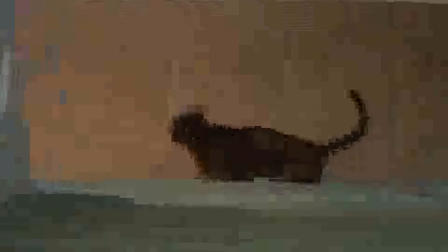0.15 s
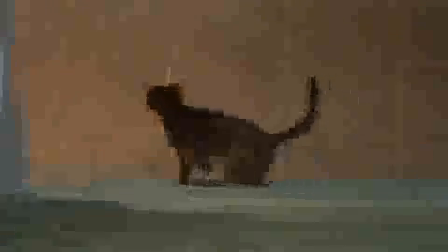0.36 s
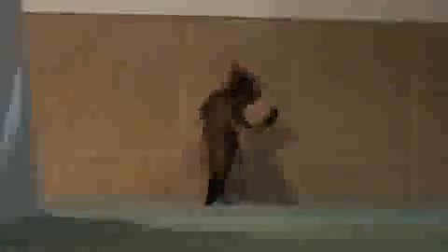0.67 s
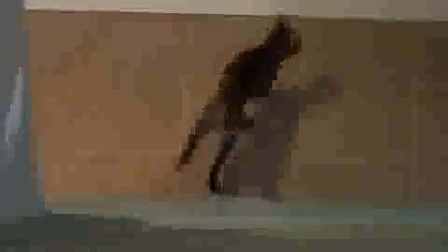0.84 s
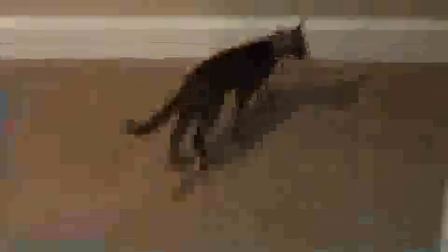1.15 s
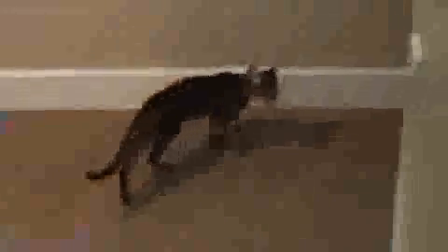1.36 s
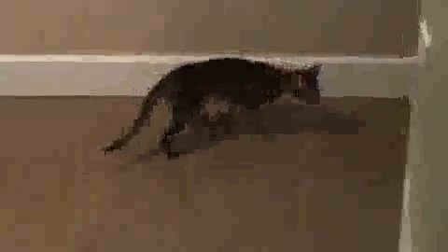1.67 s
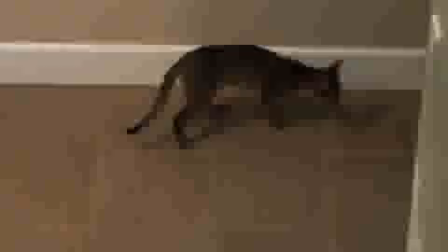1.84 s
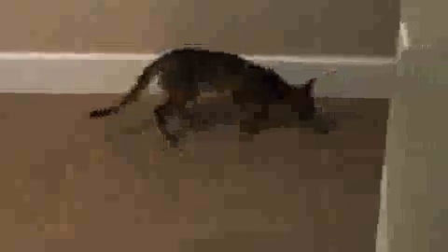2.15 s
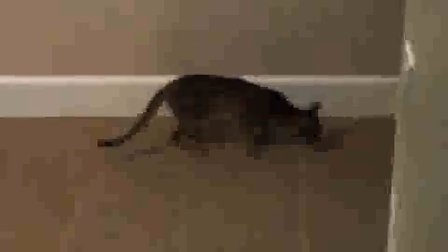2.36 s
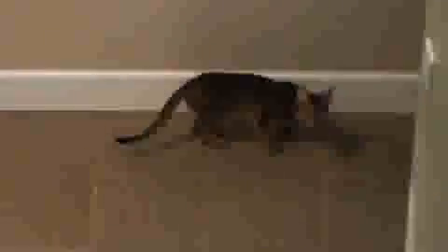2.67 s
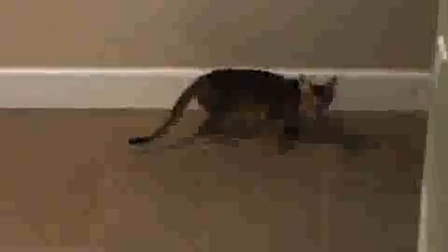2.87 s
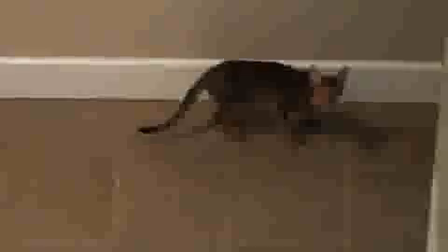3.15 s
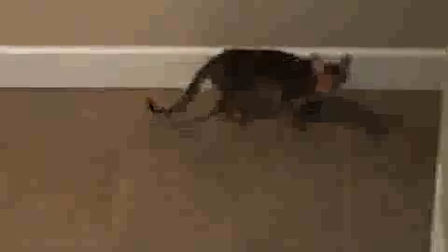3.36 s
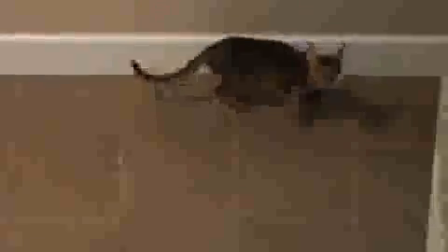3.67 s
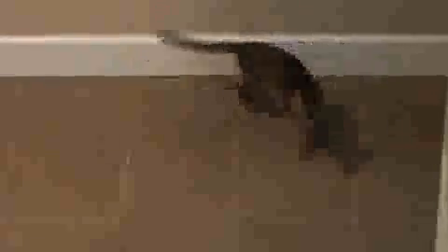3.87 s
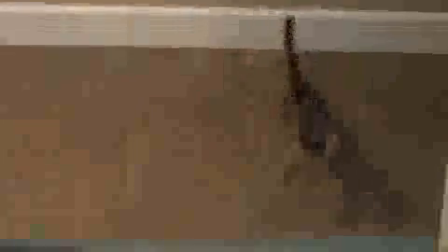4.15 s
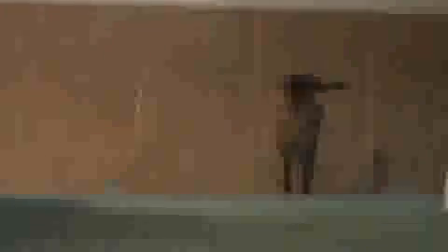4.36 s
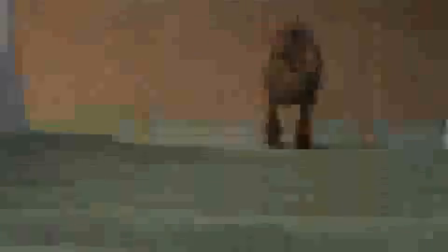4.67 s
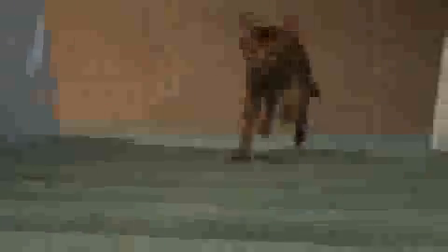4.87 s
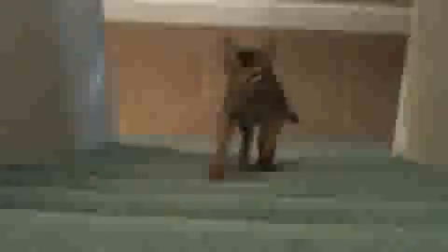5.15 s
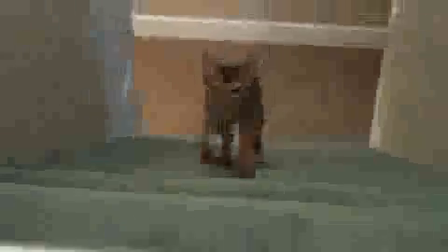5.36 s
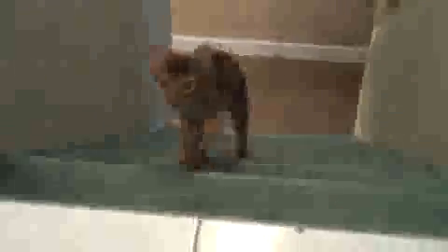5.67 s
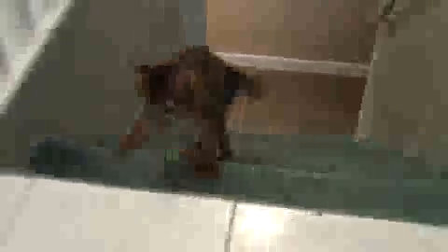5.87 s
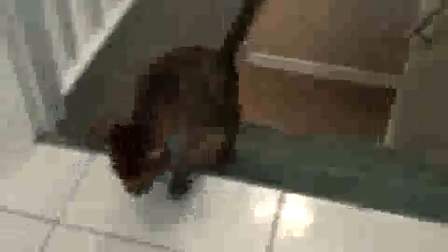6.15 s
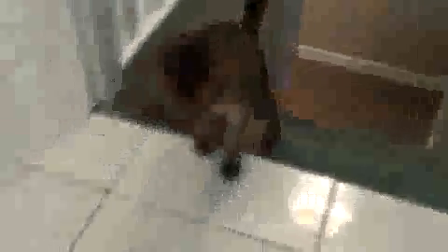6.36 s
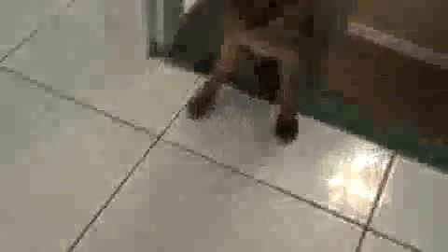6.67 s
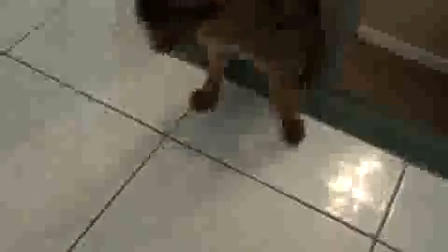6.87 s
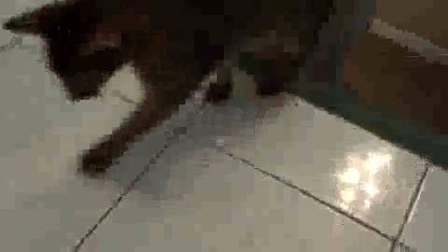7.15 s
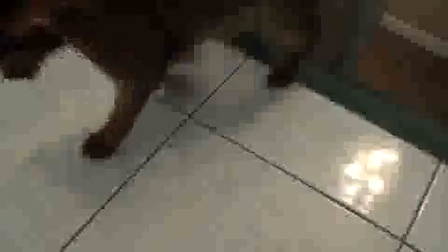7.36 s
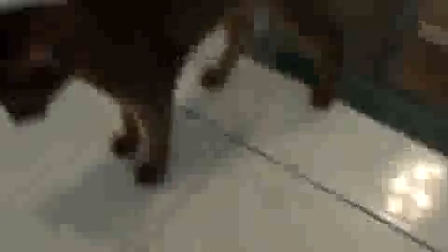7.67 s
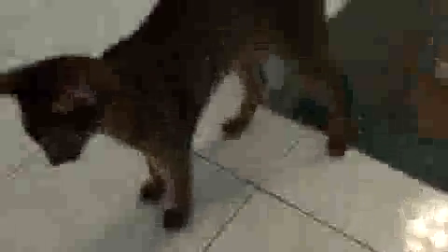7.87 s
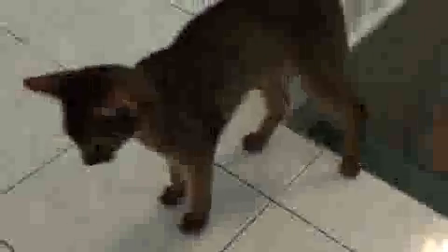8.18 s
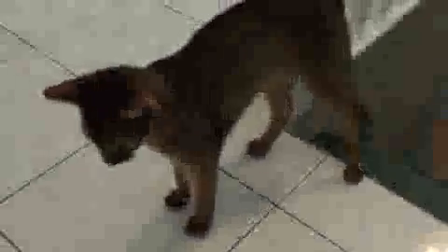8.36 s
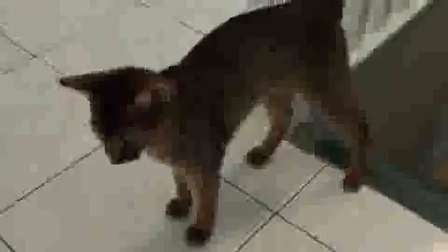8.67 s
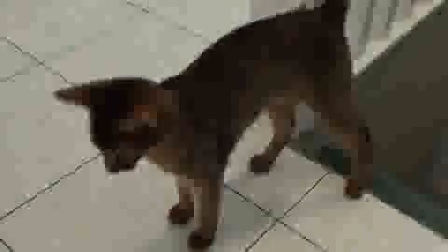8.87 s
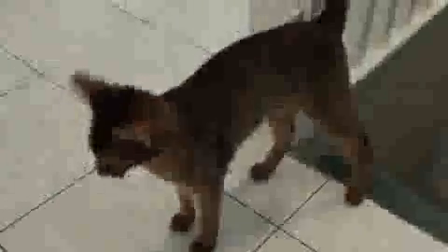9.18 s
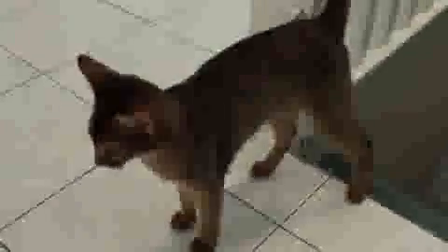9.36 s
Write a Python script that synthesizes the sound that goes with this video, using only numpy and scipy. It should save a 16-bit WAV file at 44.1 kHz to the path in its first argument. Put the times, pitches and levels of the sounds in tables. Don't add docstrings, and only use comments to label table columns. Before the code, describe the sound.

A hard, lively hallway beside carpeted stairs, heard from a camera microphone close to tile, over faint low house hum, thin motor whines and smooth hiss. From 0.25 to 1.25 seconds, a cat makes very soft paw bumps and a tiny claw tick. At 2.36, 2.6 and 2.85, three hollow wooden panel knocks ring with short reverberation, the last weaker. One paw bump comes near 3.2, a slight fur brush at 3.8. Between 4.2 and 6.0, muffled steps climb the stairs, making the boards hum low. At 6.26 a glass marble cracks brightly on tile, bouncing at 6.44, 6.59, 6.72 and 6.82, then in a tightening flurry until 6.96. It rolls with a gritty, ringing rattle and small joint clicks, stopping around 7.45. Dull paw thumps and claw taps follow until 8.0, then a soft bump at 8.8, a faint rustle near 9.1 and quiet hiss to 9.5.

```python
import sys
import numpy as np
from scipy import signal
from scipy.io import wavfile
from scipy.ndimage import uniform_filter1d

SR = 44100
rng = np.random.default_rng(int(sys.argv[2]) if len(sys.argv) > 2 else 0)


def convert_level_to_amplitude(level_db):
    exponent = np.asarray(level_db, float) / 20
    return 10 ** exponent


def wrap_up_sound(samples):
    columns = np.atleast_2d(samples).T
    tamed = np.clip(columns, -1, 1)
    steps = np.round(tamed * 32767).astype(np.int16)
    wavfile.write(sys.argv[1], SR, steps)


N = 419832

# (frequency [Hz], t60 [s])
HALLWAY_DECAY = [(200, 0.44), (530, 0.41), (1390, 0.427), (3680, 0.36), (8500, 0.368), (11000, 0.2),
                 (13000, 0.26)]


def evened(x):
    return x / np.sqrt(np.mean(x ** 2) + 1e-20)


def read(points, hz):
    f, value = np.transpose(points)
    return np.interp(np.log(hz + 1), np.log(f + 1), value)


def add(mix, s, sound):
    part = mix[..., round(s * SR):][..., :sound.shape[-1]]
    part += sound[..., :part.shape[-1]]


def causal(points, size=2048):
    hz = abs(np.fft.fftfreq(size, 1 / SR))
    log_gain = np.log(convert_level_to_amplitude(np.maximum(read(points, hz), -100)))
    taps = np.fft.ifft(np.exp(np.conj(signal.hilbert(log_gain)))).real[:size // 2]
    return taps / np.linalg.norm(taps)


def resonate(x, hz, width):
    return signal.lfilter(*signal.iirpeak(hz, hz / width, SR), x)


def noise(length, colour, same, patchy_db=0., size=512):
    hop = size // 4
    hz = np.fft.rfftfreq(size, 1 / SR)
    a, b, c, d, patches = rng.standard_normal((length // hop + 5, len(hz), 5)).T
    patches = evened(uniform_filter1d(uniform_filter1d(patches, 6, 0), 8, 1))
    like = np.clip(read(same, hz), -1, 1)[:, None]
    left = a + 1j * b
    right = like * left + np.sqrt(1 - like ** 2) * (c + 1j * d)
    z = np.array([left, right]) * convert_level_to_amplitude(read(colour, hz)[:, None] + patchy_db * patches)
    return evened(signal.istft(z, nperseg=size, noverlap=size - hop)[1][:, :length])


def tail(colour, decay, gap_s, early_db, rise_s):
    # (frequency [Hz], left-right likeness [0-1])
    hallway_same = [(60, 0.926), (240, 1), (950, 0.87), (3770, 0.72), (15000, 0.69)]
    length = SR * 5 // 8
    hz, t, z = signal.stft(noise(length, colour, hallway_same, size=1024), SR, nperseg=512)
    t60 = np.clip(read(decay, hz), .05, 2)[:, None]
    dying = signal.istft(z * convert_level_to_amplitude(-60 * t / t60), SR, nperseg=512)[1][:, :length]
    t = np.arange(length) / SR
    opening = 1 / (1 + np.exp(-(t - gap_s) / rise_s))
    return dying * (convert_level_to_amplitude(early_db) * (1 - opening) + opening) * np.minimum(t / 0.00056, 1)


def dropouts(x, share, size=2048):
    hz, t, z = signal.stft(x, SR, nperseg=size)
    luck = rng.random((len(hz) // 5 + 1, len(t) // 2 + 1))
    luck = luck.repeat(5, 0).repeat(2, 1)[:len(hz), :len(t)]
    likely = share * np.exp(-(np.log(hz / 7300 + 1e-9) / .33) ** 2)
    return signal.istft(z * (luck > likely[:, None]), SR, nperseg=size)[1][:, :N]


def background():
    # (time [s], level [dB])
    house = [
        (0, -57.5),
        (1.3, -59),
        (2.3, -58.5),
        (3.0, -56.5),
        (3.6, -57.5),
        (6.2, -57.5),
        (7.4, -52.5),
        (7.8, -54.5),
        (9.52, -58),
    ]
    # (frequency [Hz], level [dB])
    hum_colour = [(12, -46), (20, -8.5), (91, -10.5), (129, -3.5), (172, -9), (233, -3), (265, -3.5),
                  (347, -3.5), (653, -5.5), (1230, -6.5), (1500, -12), (1950, -91), (3300, -120)]
    # (frequency [Hz], level [dB])
    hiss_colour = [(820, -43), (1400, -7), (1600, 1), (2550, -2), (3330, -3), (4380, -3), (8590, -3.5),
                   (14000, -11), (15200, -12), (16000, -46)]
    # (frequency [Hz], width [Hz], level [dB])
    motors = [
        (343.4, 9.4, -72.5),
        (1076, 25, -72),
        (1206, 9.5, -71),
    ]
    # (frequency [Hz], left-right likeness [0-1])
    floor_same = [(60, 0.94), (130, 0.82), (290, 0.64), (640, 0.44), (1410, 0.25), (3100, 0.38),
                  (8000, 0.6), (10000, 0.97)]
    hum_db, hiss_db = .2, -0.18
    s, db = np.transpose(house)
    level = convert_level_to_amplitude(np.interp(np.arange(N) / SR, s, db))
    hum = noise(N, hum_colour, floor_same, patchy_db=2.0, size=2048) * level * convert_level_to_amplitude(hum_db)
    hiss = noise(N, hiss_colour, floor_same, patchy_db=1.57)
    hiss = dropouts(hiss, share=.2) * level * convert_level_to_amplitude(hiss_db)
    whine = 0
    for hz, width, db in motors:
        whine = whine + convert_level_to_amplitude(db) * evened(resonate(rng.standard_normal(N), hz, width))
    return hum + hiss + whine


def cat():
    # (time [s], peak level [dB], pitch [Hz], t60 [s])
    paws = [(0.253, -49, 210, 0.12), (0.688, -48, 240, 0.196), (0.847, -48, 304, 0.062),
            (0.919, -62, 358, 0.12), (1.239, -52, 400, 0.13), (3.218, -47, 345, 0.14),
            (4.218, -44, 234, 0.23), (4.328, -47, 191, 0.1), (4.435, -46, 221, 0.12),
            (4.797, -47, 195, 0.11), (4.939, -44, 226, 0.18), (5.201, -63, 234, 0.16),
            (5.368, -45, 237, 0.063), (5.579, -45, 132, 0.086), (6.004, -45.5, 145, 0.083),
            (7.399, -36.5, 153, 0.14), (7.628, -39, 269, 0.28), (7.78, -51, 318, 0.14),
            (8.799, -46, 346, 0.11)]
    # (time [s], peak level [dB], pitch [Hz], t60 [s])
    claws = [
        (.409, -49, 3200, .012),
        (7.633, -40, 1030, 0.034),
        (7.996, -37.5, 1050, .025),
    ]
    # (time [s], level [dB], pitch [Hz], length [s])
    rustles = [
        (0.13, -70, 6000, .12),
        (3.773, -58.5, 4800, .08),
        (5.37, -60, 5970, 0.24),
        (9.08, -65, 2950, 0.24),
    ]
    out, t = np.zeros(N), np.arange(SR // 4) / SR
    for s, db, hz, t60 in paws + claws:
        push = rng.standard_normal(len(t)) * convert_level_to_amplitude(-60 * t / max(t60, .01)) * np.minimum(t * hz / 2.0, 1)
        thump = resonate(resonate(push, hz, 0.66 * hz), hz, 0.66 * hz)
        add(out, s, convert_level_to_amplitude(db - 3.5) * thump / abs(thump).max())
    for s, db, hz, length_s in rustles:
        fur = resonate(rng.standard_normal(round(length_s * SR)), hz, 0.22 * hz)
        add(out, s - length_s / 2, convert_level_to_amplitude(db) * evened(fur) * np.hanning(len(fur)))
    return out


def knocks():
    # (time [s], peak level [dB], tick level [dB], bright tail level [dB])
    blows = [
        (2.3614, -9, -8.5, -29.5),
        (2.6073, -8.5, -14, -29),
        (2.853, -14.5, -9, -34.5),
    ]
    # (frequency [Hz], level [dB], t60 [s])
    panel_modes = [(123.5, -8, 0.37), (173, -6.5, 0.58), (221, -3, 0.44), (257, -9, 0.073),
                   (316.6, -1.5, 0.36), (389, 0, 0.19), (495.5, -12, 0.56), (516, -11, 0.18),
                   (609.5, 2.5, 0.21), (672.8, 0, 0.31), (725, -11, 0.29), (864.5, -4, 0.29),
                   (1020, -27, 0.21), (1208, -6, 0.11)]
    # (frequency [Hz], level [dB])
    panel_colour = [(60, -45), (110, -16.5), (220, -9.5), (400, -10), (555, -16), (660, -7.5), (880, -8.5),
                    (1050, -17), (1250, -18), (1600, -29), (2500, -80)]
    # (frequency [Hz], level [dB])
    tick_colour = [(900, -40), (1250, -3), (2100, -7), (3200, -13.5), (3900, -10), (7300, -8),
                   (9600, -15.5), (10500, -45), (16000, -90)]
    # (frequency [Hz], t60 [s])
    knock_decay = [(100, 0.33), (260, 0.55), (700, 0.34), (1840, 0.33), (4850, 0.3)]
    out, t = np.zeros((2, N)), np.arange(SR * 5 // 8) / SR
    panel = np.zeros(len(t))
    for k, (hz, db, t60) in enumerate(panel_modes):
        panel += convert_level_to_amplitude(db - 60 * t / t60) * np.sin(2 * np.pi * hz * t) * (-1) ** k
    answer = tail(panel_colour, knock_decay, gap_s=0.0033, early_db=3, rise_s=0.0018)
    flex = -np.sin(2 * np.pi * 270 * t) * convert_level_to_amplitude(-60 * t / 0.026)
    flex -= convert_level_to_amplitude(-10) * np.sin(2 * np.pi * 720 * t) * convert_level_to_amplitude(-60 * t / 0.022)
    snap = -np.exp(-t / .0004) * np.minimum(t / .0001, 1)
    body = convert_level_to_amplitude(-5) * panel / abs(panel).max() + convert_level_to_amplitude(-16) * answer
    body = body + convert_level_to_amplitude(-3.5) * flex + convert_level_to_amplitude(-4.0) * snap
    for s, db, tick_db, bright_db in blows:
        tick = resonate(rng.standard_normal(400), 5700, 2600) * convert_level_to_amplitude(-60 * t[:400] / 0.013)
        bright = tail(tick_colour, knock_decay, gap_s=0.0073, early_db=1.0, rise_s=.001)
        hit = convert_level_to_amplitude(db) * body + convert_level_to_amplitude(bright_db) * bright
        hit[:, :400] += convert_level_to_amplitude(db + tick_db) * tick / abs(tick).max()
        add(out, s, hit)
    return out * convert_level_to_amplitude([[.6], [-.6]])


def stairs():
    # (frequency [Hz], width [Hz], level [dB])
    boards = [
        (75, 41, -14),
        (122.5, 50, -2.5),
        (225.4, 27, 0.5),
    ]
    # (time [s], level [dB])
    treads = [
        (4.22, -64),
        (4.45, -51),
        (4.95, -59),
        (5.57, -56),
        (6.0, -72),
    ]
    start_s, end_s, climb_db = 4.15, 6.1, -59.5
    rise_s, t60_s = .03, .15
    t = np.arange(start_s, end_s, 1 / SR)
    drum = np.zeros(len(t))
    for hz, width, db in boards:
        drum += convert_level_to_amplitude(db) * evened(resonate(resonate(rng.standard_normal(len(t)), hz, width), hz, width))
    load = convert_level_to_amplitude(climb_db)
    for s, db in treads:
        load = load + convert_level_to_amplitude(db - 60 * np.maximum(t - s, 0) / t60_s) * np.clip(1 + (t - s) / rise_s, 0, 1)
    out = np.zeros(N)
    add(out, t[0], convert_level_to_amplitude(-5.5) * load * drum * signal.windows.tukey(len(t), .1))
    return out


def click(hz, thud_db):
    # (frequency [Hz], level [dB])
    contact_colour = [(300, -34), (1000, -4), (2500, -21), (5000, -8.5), (8000, -4), (11000, -23),
                      (13000, -22), (15000, -28), (17000, -64)]
    t = np.arange(400) / SR
    ring = np.sin(2 * np.pi * hz * t) * convert_level_to_amplitude(-60 * t / 0.0024) * np.minimum(t * hz, 1)
    ring[:200] += convert_level_to_amplitude(-0.5) * causal(contact_colour)[:200]
    echoes = np.zeros(260)
    at = rng.integers(12, 260, 14)
    echoes[at] = rng.choice([-1., 1.], len(at)) * convert_level_to_amplitude(-7 - 60 * at / SR / .016)
    echoes[[0, rng.integers(16, 34)]] = 1, .9
    thud = resonate(rng.standard_normal(len(t)), 2100, 2960) * convert_level_to_amplitude(-60 * t / 0.027)
    sound = np.convolve(ring, echoes)
    sound /= abs(sound).max()
    sound[:len(t)] += convert_level_to_amplitude(thud_db) * thud
    return sound


def marble():
    # (time [s], peak level [dB], ring [Hz], hallway share [dB])
    bounces = [(6.2636, -5.5, 7130, 6.5), (6.4448, -3, 7750, 3), (6.5925, -4.5, 7600, 3.5),
               (6.7172, -2, 7700, 0), (6.8189, -9.5, 5600, -2.5), (6.8418, -7, 8100, -16),
               (6.8659, -7.5, 8100, -9), (6.8921, -5.5, 8110, -6), (6.9121, -7.5, 8100, -4),
               (6.9292, -10.5, 7300, -8), (6.9421, -8.5, 7700, -7), (6.9561, -12.5, 7800, -17)]
    # (time [s], peak level [dB], ring [Hz])
    skips = [(6.9674, -22, 7960), (6.976, -30, 4510), (7.014, -20, 6950), (7.022, -25, 4570),
             (7.0783, -24, 4470), (7.1024, -27, 4520), (7.1765, -25, 4770), (7.2273, -28, 4700),
             (7.2677, -30, 4620), (7.2736, -21, 6500), (7.2876, -36, 6630), (7.3216, -26.5, 6470),
             (7.339, -30, 6500), (7.3732, -20, 6200), (7.3804, -32, 6500)]
    # (frequency [Hz], level [dB])
    hallway_colour = [(59, -57), (100, -17), (204, -11.5), (246, -10), (297, -11.5), (904, -4), (1070, -5),
                      (6910, -4.5), (12400, -13.5), (15000, -61)]
    # (delay [s], level [dB])
    walls = [
        (0.0132, -12.5),
        (0.016, -13),
        (.0185, -34.5),
    ]
    skip_hall_db = -6
    clean_hz, thud_db, boom_db = 7800, -9, -.5
    dull_thud_db, dull_boom_db = 2.5, 4
    out = np.zeros((2, N))
    answers = [tail(hallway_colour, HALLWAY_DECAY, gap_s=0.013, early_db=-11, rise_s=0.0014)
               for _ in range(4)]
    lows = [signal.lfilter(*signal.butter(1, 2200, fs=SR), a) for a in answers]
    landings = bounces + [(*skip, skip_hall_db) for skip in skips]
    for k, (s, db, hz, hall_db) in enumerate(landings):
        turn = k % len(answers)
        dull = np.clip((clean_hz - hz) / 1000, 0, 1.5)
        hit = convert_level_to_amplitude(db) * click(hz, thud_db + dull_thud_db * dull)
        boom = convert_level_to_amplitude(boom_db + dull_boom_db * dull) - 1
        add(out, s + 0.000993, hit * convert_level_to_amplitude([[.4], [-.4]]))
        add(out, s + 0.001001, convert_level_to_amplitude(db + hall_db - 16.0) * (answers[turn] + boom * lows[turn]))
        for delay, wall_db in walls:
            add(out, s + 0.00091 + delay, convert_level_to_amplitude(wall_db + hall_db) * hit)
    return out


def glide(x, hz, width):
    turn = np.exp(2j * np.pi * np.cumsum(hz) / SR)
    r = np.exp(-np.pi * width / SR)
    return 2 * (turn * signal.lfilter([1 - r], [1, -r], x / turn)).real


def rolling():
    # (frequency [Hz], level [dB])
    rattle_colour = [(88, -38), (150, -11.5), (675, -5), (781, -10), (856, -2.5), (3920, -4), (4630, -7),
                     (8020, -10.5), (12000, -69), (15600, -63), (22000, -120)]
    # (frequency [Hz], width [Hz], level [dB])
    floor_rings = [
        (881, 180, -6),
        (1620, 270, -6.5),
        (3480, 250, -13),
        (4560, 160, 9),
        (6630, 420, -1),
        (7700, 530, -15),
    ]
    start_s, stop_s, start_db, slowing_db_per_s = 6.95, 7.452, -34.5, -5.5
    bump_db, bump_s, release_s, release_db = 7.5, 0.0083, 0.025, -23
    drift_share, drift_hz = .018, 3.2
    grain_db, grain_s = 1.8, .012
    t = np.arange(start_s, stop_s + release_s, 1 / SR)
    db = start_db + slowing_db_per_s * (t - t[0])
    db += bump_db * np.clip(1 + (t - stop_s) / bump_s, 0, 1)
    db += release_db * np.maximum(t - stop_s, 0) / release_s
    db += grain_db * evened(uniform_filter1d(rng.standard_normal(len(t)), round(grain_s * SR)))
    drift = 1 + drift_share * np.sin(2 * np.pi * drift_hz * (t - t[0]))
    struck = rng.random(len(t)) < 8000 / SR
    force = np.minimum(rng.exponential(1, len(t)), 4)
    grit = rng.choice([-1., 1.], len(t)) * struck * convert_level_to_amplitude(2.2 * force)
    rings = sum(convert_level_to_amplitude(ring_db) * glide(grit, hz * drift, width) for hz, width, ring_db in floor_rings)
    grit = grit + convert_level_to_amplitude(7) * rings
    drive = evened(np.convolve(grit, causal(rattle_colour))[:len(t)]) * convert_level_to_amplitude(db)
    out = np.zeros((2, N))
    add(out, t[0], convert_level_to_amplitude(-5) * drive)
    travel = (t - t[0]) / (t[-1] - t[0])
    for k in range(3):
        near = np.cos(np.pi / 2 * np.clip(2 * travel - k, -1, 1))
        answer = tail([(100, -0.87), (16000, -1.8)], HALLWAY_DECAY, gap_s=0.0088, early_db=8.5, rise_s=0.0013)
        answer = answer / np.linalg.norm(answer[0])
        add(out, t[0], convert_level_to_amplitude(-3.0) * signal.fftconvolve((drive * near)[None], answer, axes=1))
    return out


def scene():
    glass_cut = signal.butter(2, 150, "high", fs=SR, output="sos")
    wood_band = signal.butter(3, [85, 9500], "band", fs=SR, output="sos")
    glass = signal.sosfilt(glass_cut, marble() + rolling())
    wood = signal.sosfilt(wood_band, knocks())
    return background() + cat() + wood + stairs() + glass


def thin_treble(x, size, swing_db, attack_db):
    # (frequency [Hz], level [dB])
    threshold = [(8000, -40), (9500, -22), (10500, -17), (13000, -17.5), (14500, -20), (16000, -26)]
    hz, t, z = signal.stft(x, SR, nperseg=size)
    power = (abs(z) ** 2).mean(0)
    band = uniform_filter1d(power, 7, 0)[::7].repeat(7, 0)[:len(hz)]
    treble = power[(hz > 1500) & (hz < 9000)].mean(0)
    waver_db = swing_db * evened(uniform_filter1d(rng.standard_normal(len(t)), 5))
    keep = band > treble * convert_level_to_amplitude(read(threshold, hz)[:, None] + waver_db) ** 2
    keep |= treble > np.roll(treble, 2) * convert_level_to_amplitude(attack_db) ** 2
    hush = np.roll(treble, -2) > treble * convert_level_to_amplitude(30) ** 2
    keep &= ~(hush & (hz > 2500)[:, None])
    return signal.istft(z * keep, SR, nperseg=size)[1][:, :N]


def roll_off(x):
    return signal.sosfilt(signal.butter(12, 16820, fs=SR, output="sos"), x)


def record(dry):
    heard = signal.sosfilt(signal.butter(2, 45, "high", fs=SR, output="sos"), dry)
    heard = signal.sosfilt(signal.butter(12, 15500, fs=SR, output="sos"), heard)
    thinned = thin_treble(heard, size=512, swing_db=2.5, attack_db=13)
    return roll_off(thinned)


dry = scene()
out = record(dry)
wrap_up_sound(out)
```